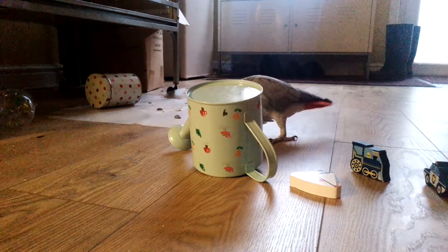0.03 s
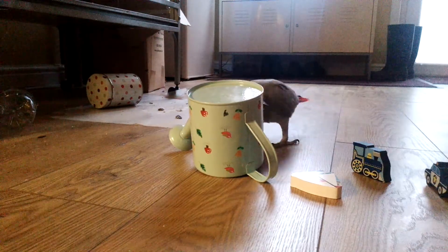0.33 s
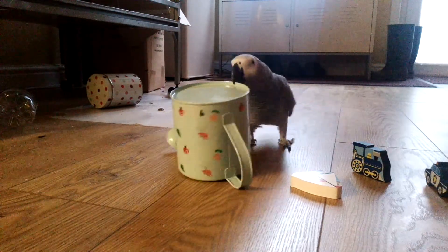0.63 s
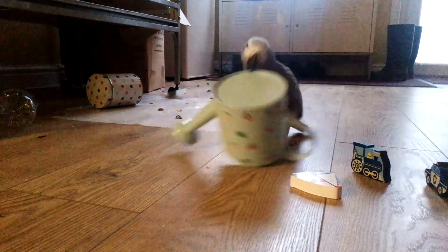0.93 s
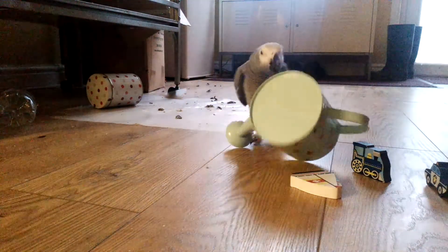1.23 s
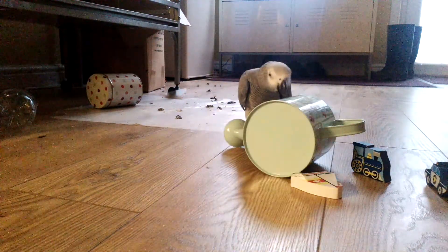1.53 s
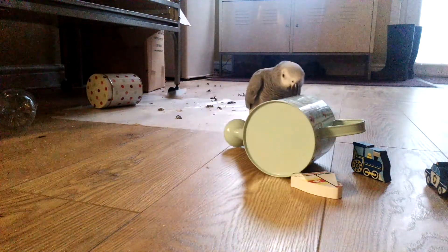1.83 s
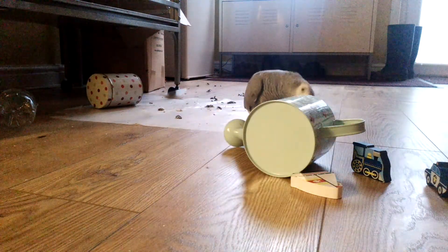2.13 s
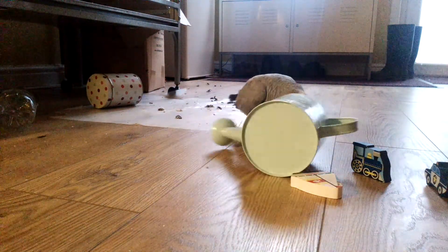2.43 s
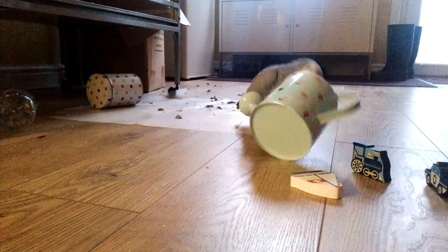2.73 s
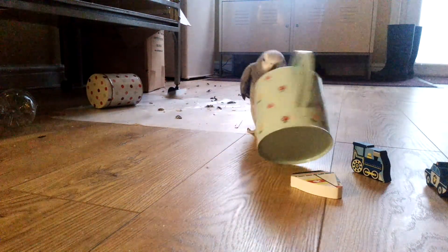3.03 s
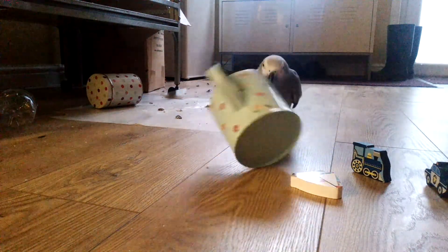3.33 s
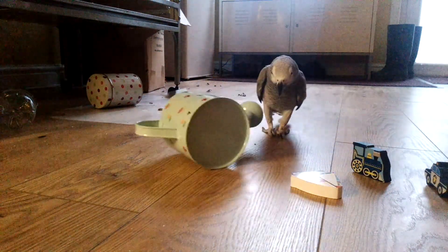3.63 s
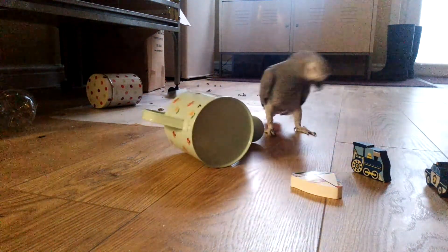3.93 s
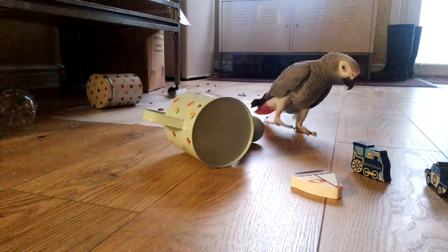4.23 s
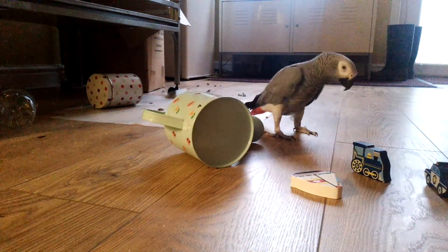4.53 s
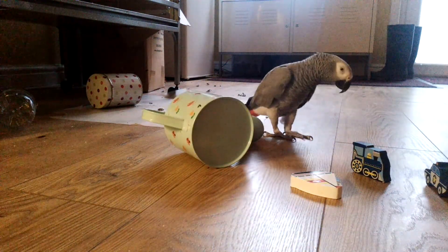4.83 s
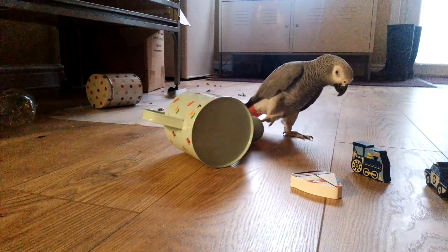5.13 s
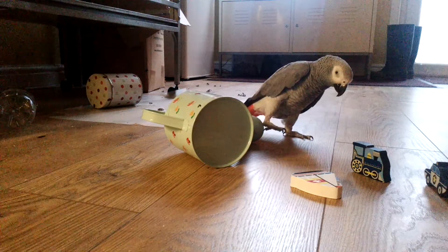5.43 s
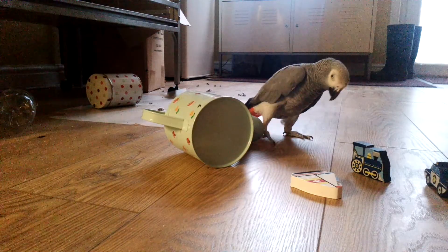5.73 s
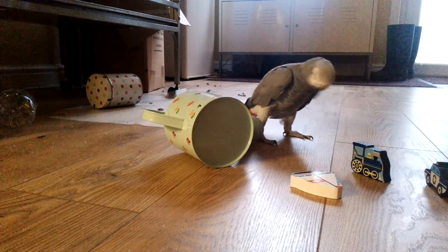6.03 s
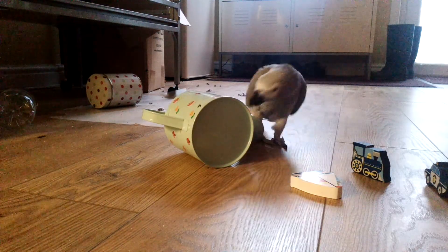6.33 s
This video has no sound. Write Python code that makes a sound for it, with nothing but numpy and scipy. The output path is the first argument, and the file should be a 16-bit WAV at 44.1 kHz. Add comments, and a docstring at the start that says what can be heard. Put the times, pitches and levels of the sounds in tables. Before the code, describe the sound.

A parrot's beak clinks on a small tin watering can and drags it over a wooden floor with a juddering scrape. The can tips over with loud, ringing clanks. After a few light pecks it scrapes again, drops and rattles to rest. Faint claw ticks and soft feather brushes follow, then another beak clink. The microphone is close in a small room, and the loudest crashes overload it slightly.

```python
"""Parrot with a tin watering can

A parrot pecks a small tin can, drags it over a wooden floor, tips it, lifts it and drops it. Blows set
the thin wall ringing and thump the flat bottom; the rim sticks and slips on the grain. The can rattles
to rest, claws tick on the boards and the beak clinks on the tin again. A small room answers, and the
loudest crashes overload the nearby microphone."""
import sys
import numpy as np
from scipy import signal
from scipy.fft import rfft, irfft, next_fast_len
from scipy.io import wavfile
from scipy.ndimage import map_coordinates

SR = 44100
rng = np.random.default_rng(int(sys.argv[2]) if len(sys.argv) > 2 else 0)


def unload_audio(sound):
    """Save the sound as a 16-bit wav file, at the path given as the first command line argument."""
    columns = np.transpose(np.atleast_2d(sound))
    # keep every value between -1 and 1, then stretch to whole-number steps
    steps = np.round(np.clip(columns, -1, 1) * 32767)
    wavfile.write(sys.argv[1], SR, steps.astype(np.int16))


N = 290619

# Levels in the tables are relative: the functions set the mix.
# room tone spectrum: f/Hz, level/dB
ROOM_TONE_EQ = [(12, -25.5), (20, 1.5), (76, -12), (103, -3.5), (124, -17), (270, -17), (571, -28),
                (889, -26.5), (1640, -30.5), (4820, -31.5), (8160, -34), (13800, -31.5), (15000, -42.5)]
# reverb decay: f/Hz, t60/s
ROOM_T60 = [(120, 0.15), (500, 0.37), (2000, 0.38), (5000, 0.32), (13000, 0.29)]
# stereo image of diffuse sound, then of the room tone: f/Hz, left-right likeness (1 = mono)
DIFFUSE_LIKENESS = [(300, .99), (1000, 1), (2500, 0.98), (4500, 0.81), (7000, .55), (11000, .4)]
ROOM_TONE_LIKENESS = [(60, 0.93), (300, 0.4), (1000, .45), (3000, 0.18), (10000, .1)]
# feet and feathers brushing: t/s, level/dB
BRUSHES = [(.244, -45.5), (2.093, -48), (2.426, -49.5), (4.101, -55), (4.958, -52.5), (5.828, -61),
           (5.91, -58.5), (6.25, -55), (6.313, -52)]
# bright colour of brushes and claw clicks: f/Hz, level/dB
BIRD_EQ = [(600, -24), (1500, -19.5), (2800, -1.5), (5000, 0), (8000, -4.5), (14000, -8)]
# the can's main modes: f/Hz, level/dB, t60/s
TIN_MODES = [(312, -4, .35), (346, -2, .28), (401, 4, .42), (505, -2, .45), (569, -4, .28), (694, -7, .33),
             (871, -13, .22), (964, -9, .22), (1062, -9, .36), (1110, -4, .38), (1267, -7, .42),
             (1386, -5.5, .42), (1458, -5.5, .33), (1565, -6, .45), (1680, -12, .33), (1853, -9, .4),
             (1990, -5, .18), (2083, -10, .55), (2148, -12, .32), (2308, -11, .36), (2611, -9, .4),
             (2661, -8, .3), (2805, -2, .13), (2971, -3, .24), (3060, -3, .23), (3520, -12, .22),
             (4010, -11, .13), (4124, -16, .28), (4594, -13, .28), (5380, -10, .2), (6445, -13, .16)]
# wash of weaker sheet-metal modes: f/Hz, level/dB
SHEET_EQ = [(30, -31), (70, -17), (140, 3.5), (350, 7), (600, -0.5), (830, -5.5), (1400, -2), (3000, -3.5),
            (4100, -5), (5000, -7.5), (7500, -14), (14000, -13.5)]
# decay of that wash: f/Hz, t60/s
SHEET_T60 = [(150, 0.27), (1500, .22), (4000, 0.22), (12000, 0.0794)]
# edges of a blow's bass, mid, treble and sizzle bands: f/Hz
BAND_EDGES = [120, 650, 1800, 5000, 14000]
# beak on tin: t/s, treble level/dB, body offset/dB, sizzle offset/dB, favoured f/Hz
PECKS = [(.437, -23, -18, 0, 4010), (.591, -26, -13.5, 0, 3520), (0.62, -35, 6.5, -5, 1110),
         (1.536, -41, 1, 0.5, 4124), (1.908, -43.5, -13.5, -1, 2083), (1.955, -53, -2, -7, 1060),
         (2.083, -49.5, -4, -13, 2083), (2.169, -46.5, -3.5, -4, 1565), (2.192, -28.5, -16, -7, 2308),
         (2.897, -47.5, 0.5, 7, 401), (3.149, -52, 6.5, -0.5, 1853), (6.463, -40, -5, 3.5, 694),
         (6.5, -53, 7.5, 3, 401)]
# two continuous scrapes of the can, upright and then on its side: t/s, drag level/dB, hiss level/dB
DRAG_UPRIGHT = [
    [(0.46, -44, -43), (0.536, -30, -44.5), (0.554, -37, -60.5), (0.58, -26, -47)],
    [(0.68, -45, -58), (0.75, -27.5, -53), (0.83, -26, -34), (0.895, -31, -34.5)],
    [(0.99, -23.5, -42.5), (1.026, -32, -39), (1.062, -35.5, -49), (1.11, -36, -46)],
    [(1.22, -31.5, -47.5), (1.266, -39, -59), (1.31, -32, -50.5), (1.34, -36, -54.5)],
]
DRAG_ON_SIDE = [
    [(2.39, -52, -64), (2.424, -55.5, -54), (2.464, -44, -63), (2.49, -50, -75)],
    [(2.57, -39.5, -60), (2.646, -29.5, -50), (2.742, -37.5, -45.5), (2.87, -30, -65)],
    [(3.03, -33, -56), (3.114, -35, -54), (3.38, -60, -85), (3.48, -46, -74.5)],
]
# low, middle and high layers of the scrape: f/Hz, level/dB
JUDDER_EQ = [(50, -35), (110, -9.5), (200, 4), (290, 1.5), (380, 2), (460, -6.5), (650, -4.5), (1000, -43),
             (2000, -69.5)]
GRIND_EQ = [(300, -29), (650, 4.5), (1100, -1), (2000, -5), (3200, -17.5), (4500, -25.5), (9000, -46.5)]
HISS_EQ = [(1200, -32), (2800, -0.5), (5200, -3), (6300, -5.5), (9000, -5), (14000, -5.5)]
# can on boards: t/s, mid level/dB, bass offset/dB, treble offset/dB, sizzle offset/dB,
# favoured f/Hz, ring length factor, rebound delay/s
LANDINGS = [(.911, -24.5, 14.5, -6.5, -15, 1110, 0.97, 0.038), (1.123, -26, 5, -1.5, -10.5, 2611, 1, 0.019),
            (1.367, -12.5, 7, -6, -14.5, 1062, 0.62, 0.016), (1.418, -17.5, 5, -16.5, -18.5, 694, 1, .013),
            (2.502, -35.5, 2, -7, -27, 1090, 1.23, .025), (2.932, -25.5, -2.5, 0.5, -17, 401, 0.33, .035),
            (3.507, -22, 9.5, 8.5, 0.5, 1565, 1.33, 0.023), (3.564, -24.5, 11, 9, -4, 569, 1.67, .026),
            (3.613, -26.5, 4, -3, -21, 2945, 1.3, .03), (3.835, -23, -3.5, 7.5, -8, 2766, .95, .012),
            (3.869, -24, 0.5, -13.5, -18.5, 569, 1.1, 0.064)]
# loss on the rebound: bass/dB, mid/dB, treble/dB, sizzle/dB
REBOUND_LOSS_DB = [14, 7.7, 12, 11]
# single tones of the can singing on after a blow: t/s, level/dB, f/Hz, hold/s
SINGING_MODES = [(.95, -20.5, 505, 0.29), (.92, -32, 1105, 0.22), (1.123, -15.5, 396.2, 0.062),
                 (1.38, -37, 2100, 0.21), (1.4, -50, 1009, 0.36), (2.932, -23, 401.4, 0.19),
                 (2.95, -26, 1270, 0.061), (3.06, -38.5, 1267, 0.14), (3.149, -50.5, 1857, 0.13),
                 (3.15, -45, 403.5, .3), (3.52, -15.5, 555.3, 0.11), (3.564, -14.5, 397.6, .08),
                 (3.87, -23.5, 401, 0.089)]
# claws and beak on wood: t/s, level/dB, knock offset/dB
TICKS = [(4.4282, -31, -25), (4.7003, -36, -23), (4.7752, -37, -23), (4.802, -29, -11.5),
         (5.7206, -38, -15), (5.8101, -44.5, -23), (5.915, -43.5, -18), (6.2025, -45, -3),
         (6.2409, -31.5, -29), (6.358, -30, -16.5)]


def amp(db):
    """Decibels to gain."""
    return 10 ** (np.asarray(db) / 20)


def unit(x):
    """x at rms 1."""
    return x / np.sqrt(np.mean(x ** 2) + 1e-20)


def along(points, hz):
    """Read (f/Hz, value) points on a log frequency axis."""
    f, values = np.transpose(points)
    return np.interp(np.log(hz + 1), np.log(f + 1), values)


def filtered(x, response):
    """x through a frequency response."""
    n = x.shape[-1]
    padded = next_fast_len(n + 8192)
    return irfft(rfft(x, padded) * response(np.fft.rfftfreq(padded, 1 / SR)), padded)[..., :n]


def eq(x, points):
    """x through a minimum-phase EQ drawn as (f/Hz, level/dB) points."""
    def response(hz):
        cepstrum = irfft(np.log(amp(along(points, hz))))
        half = len(cepstrum) // 2
        return np.exp(rfft(np.r_[cepstrum[0], 2 * cepstrum[1:half]], 2 * half))
    return filtered(x, response)


def wobble(rate):
    """A random modulator with `rate` breakpoints a second."""
    knots = rng.standard_normal(int(N * rate / SR) + 4)
    return map_coordinates(knots, [np.arange(N) * rate / SR], order=1)


def wavering(hz, drift_hz, waver_db=5.5):
    """One resonance, unsteady in pitch and level."""
    level = amp(waver_db * wobble(66))
    pitch = hz + drift_hz * wobble(hz / 5)
    return level * np.sin(2 * np.pi * np.cumsum(pitch) / SR)


def bump(s, width_s):
    """A bell-shaped fade in and out, centred on time s."""
    return np.exp(-.5 * ((np.arange(N) / SR - s) / width_s) ** 2)


def faders(points):
    """Gain curves for the drag and hiss of one continuous scrape, silent before and after it."""
    s, *columns = np.vstack(points).T
    return amp([np.interp(np.arange(N) / SR, s, db, left=-120, right=-120) for db in columns])


def dying_noise(t60s, size):
    """Noise in which each frequency dies at its own speed."""
    hz, t, spectra = signal.stft(rng.standard_normal(size), SR, nperseg=256)
    decay = amp(-60 * t / along(t60s, hz)[:, None])
    return signal.istft(spectra * decay, SR, nperseg=256)[1][:size]


def diffuse(pair, likeness=DIFFUSE_LIKENESS):
    """Two unrelated signals as a diffuse field at two close mics: narrow bass, wide treble."""
    def mid_side_gains(hz):
        angle = np.arccos(np.clip(along(likeness, hz), -1, 1)) / 2
        return np.array([np.cos(angle), np.sin(angle)])
    mid, side = filtered(pair, mid_side_gains)
    return np.array([mid + side, mid - side])


def in_room(x, wet_db):
    """The direct sound plus the small room's short tail."""
    size = SR // 2
    tail = diffuse(np.array([dying_noise(ROOM_T60, size) for _ in range(2)]))
    tail *= 1 - np.exp(-np.arange(size) / SR / .0013)
    wet = signal.fftconvolve(np.atleast_2d(x), tail / np.linalg.norm(tail[0]), axes=1)
    return x + amp(wet_db) * wet[:, :x.shape[-1]]


def panned(x, left_db, lead_s):
    """A source left of centre reaches the left mic earlier and louder."""
    sides = np.array([[1], [-1]])
    return amp(sides * left_db / 2) * filtered(x, lambda hz: np.exp(1j * np.pi * hz * lead_s * sides))


def add(track, sound, s):
    """Mix a sound into the track at time s."""
    part = track[:, round(s * SR):][:, :sound.shape[-1]]
    part += sound[..., :part.shape[-1]]


def room_tone():
    """A faint, steady bed of rumble and hiss."""
    air = diffuse(rng.standard_normal((2, N)), ROOM_TONE_LIKENESS)
    return amp(-59) * unit(eq(air, ROOM_TONE_EQ))


def brushes():
    """Soft gritty swishes as the bird shifts its feet and wings."""
    level = sum(amp(db) * bump(s, width_s=.021) for s, db in BRUSHES)
    grit = unit(eq(amp(4.2 * wobble(220)) * rng.standard_normal(N), BIRD_EQ))
    return in_room(amp(-1.5) * level * grit, wet_db=-1.5)


def wall_ripple(x, depth_db):
    """Each point of the thin wall radiates its own pattern of shallow peaks and dips."""
    hz = np.arange(600, 15000, 170)
    ripple_db = depth_db * np.tanh(rng.standard_normal(len(hz))) * (hz > hz[0])
    return eq(x, np.c_[hz, ripple_db])


def voiced(sound, bands_db):
    """Where and how hard the can is hit sets its tone: EQ the blow so its attack nears bands_db."""
    attack, n_fft = sound[:, :int(.03 * SR)], 8192
    power = 2 * np.mean(abs(rfft(attack, n_fft)) ** 2, axis=0) / (n_fft * attack.shape[1])
    hz = np.fft.rfftfreq(n_fft, 1 / SR)
    points = [(np.sqrt(lo * hi), db - 10 * np.log10(power[(hz >= lo) & (hz < hi)].sum()))
              for lo, hi, db in zip(BAND_EDGES, BAND_EDGES[1:], bands_db)]
    return eq(sound, points)


def tin_ring(t, favoured_hz, length):
    """The struck modes ring out; the point of contact lifts those near one frequency."""
    hz, mode_db, t60 = np.transpose(TIN_MODES)[:, :, None]
    lift_db = 11 * np.exp(-(np.log(hz / favoured_hz) / .05) ** 2)
    scatter_db = 2.5 * rng.standard_normal(hz.shape)
    decay_db = -60 * t / (t60 * length)
    partials = np.sin(2 * np.pi * (hz * t + rng.random(hz.shape))) * (1 - np.exp(-t / .002))
    return np.sum(amp(mode_db + lift_db + scatter_db + decay_db) * partials, axis=0)


def sheet_crash(t, contact_s):
    """A crack and a wash of weak modes; a sliding contact spreads the same push over more time."""
    push = amp(1) / np.sqrt(contact_s) * np.exp(-t / contact_s)
    crack = push * diffuse(rng.standard_normal((2, len(t))))
    wash = amp(10) * dying_noise(SHEET_T60, len(t))
    return wall_ripple(eq(wash + crack, SHEET_EQ), depth_db=3)


def bottom_thump(t, bass_db, mid_db, t60=.04):
    """The flat bottom thumps under a heavy blow; a harder one buckles it and lowers its note."""
    level_db = min(-.5 + 3 * max(bass_db + 20, 0), 27.5)
    hz = 352 - 4 * max(mid_db + 23, 0)
    envelope = amp(level_db - 60 * t / t60) * (1 - np.exp(-t / .0021))
    return envelope * np.sin(2 * np.pi * hz * t)


def strike(bands_db, favoured_hz, contact_s, length, ring_db):
    """One clank in three layers: ringing modes, sheet-metal crash and bottom thump."""
    t = np.arange(int(.7 * SR)) / SR
    ring = amp(ring_db) * tin_ring(t, favoured_hz, length)
    crash = in_room(sheet_crash(t, contact_s), wet_db=-2.5)
    thump = bottom_thump(t, bass_db=bands_db[0], mid_db=bands_db[1])
    return voiced(crash + ring + thump, bands_db)


def pecks():
    """The hard beak slides as it strikes: a bright clink, with more body the more it pushes."""
    out = np.zeros((2, N))
    for s, db, body_db, sizzle_db, favoured_hz in PECKS:
        bands_db = db + np.array([body_db, body_db, 0, sizzle_db])
        add(out, strike(bands_db, favoured_hz, contact_s=.007, length=.95, ring_db=1), s)
    return out


def tin_response(hz):
    """The can's modes as a resonator bank, damped by the floor and the beak."""
    return sum(amp(db) * 1j * hz * (5 / t60) / (mode_hz ** 2 - hz ** 2 + 1j * hz * (5 / t60))
               for mode_hz, db, t60 in TIN_MODES)


def drag(on_side_db=5.5, hiss_share=.44):
    """The rim sticks and slips on the wood grain; the slips shake both boards and can."""
    # lying down, the thin wall shakes more than the stiff base
    judder, hiss = faders(DRAG_UPRIGHT) + amp([[on_side_db], [0]]) * faders(DRAG_ON_SIDE)
    grind = judder ** (1 - hiss_share) * hiss ** hiss_share
    slips = amp(3.5 * wobble(55) + 2 * wobble(400))
    scrape = np.zeros((2, N))
    for fader, colour, trim_db in [(judder, JUDDER_EQ, -9.5), (grind, GRIND_EQ, -5), (hiss, HISS_EQ, .5)]:
        friction = slips * diffuse(rng.standard_normal((2, N)))
        scrape += amp(trim_db) * fader * unit(eq(friction, colour))
    return in_room(scrape + amp(6) * filtered(scrape, tin_response), wet_db=-4)


def bottom_groan():
    """Friction feeds one low resonance of the bottom while the can is dragged upright."""
    return amp(1) * faders(DRAG_UPRIGHT)[0] * wavering(hz=353, drift_hz=14)


def rim_rasp():
    """Friction briefly feeds one high resonance of the rim."""
    return amp(-30.5) * bump(.86, width_s=.035) * wavering(hz=5200, drift_hz=800)


def landings():
    """The can hits the floor, rebounds and hits it again more softly."""
    out = np.zeros((2, N))
    for s, db, bass_db, treble_db, sizzle_db, favoured_hz, length, flight_s in LANDINGS:
        first_db = db + np.array([bass_db, 0, treble_db, sizzle_db])
        for hit_s, bands_db in [(s, first_db), (s + flight_s, first_db - REBOUND_LOSS_DB)]:
            add(out, strike(bands_db, favoured_hz, contact_s=.0016, length=length, ring_db=-2), hit_s)
    return out


def singing(rise_s=.045, sag_db_per_s=20.5, release_t60=.19):
    """Single tones of the can swell after a blow, hold for a set time, then fade."""
    out = np.zeros(N)
    for s, db, hz, hold_s in SINGING_MODES:
        age = np.maximum(np.arange(N) / SR - s, 0)
        swell = 1 - np.exp(-age / rise_s)
        release = amp(-60 * np.maximum(age - hold_s, 0) / release_t60)
        tone = wavering(hz, drift_hz=3.2, waver_db=.87)
        out += amp(db - sag_db_per_s * age) * swell * release * tone
    return out


def ticks(trim_db=-32.5):
    """Claw or beak meets wood: a sharp click and a small knock in the board."""
    out, t = np.zeros((2, N)), np.arange(SR // 2) / SR
    board_eq = [(80, -32), (300, 5), (1000, -2), (3000, -24)]  # f/Hz, level/dB
    for s, db, knock_db in TICKS:
        click = unit(eq(np.exp(-t / .0036) * rng.standard_normal(len(t)), BIRD_EQ))
        knock = unit(eq(np.exp(-t / .0074) * rng.standard_normal(len(t)), board_eq))
        add(out, in_room(amp(db + trim_db) * (click + amp(knock_db) * knock), wet_db=.5), s)
    return out


def scene():
    """Can and bird just left of centre, over the room tone."""
    can = landings() + pecks() + singing() + drag() + bottom_groan() + rim_rasp()
    bird = ticks() + brushes()
    return panned(can + bird, left_db=.8, lead_s=2.2e-6) + room_tone()


def record(dry):
    """The crashes clip at full scale; a steep low-pass takes off the very top."""
    clipped, cutoff_hz = np.clip(dry, -1, 1), 14450
    return filtered(clipped, lambda hz: 1 / np.sqrt(1 + (hz / cutoff_hz) ** 120))


dry = scene()
out = record(dry)
unload_audio(out)
```